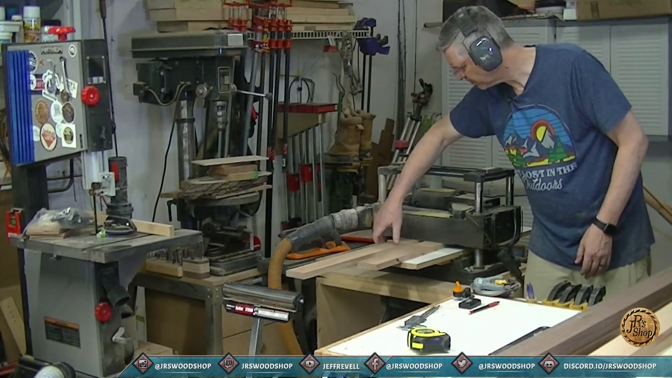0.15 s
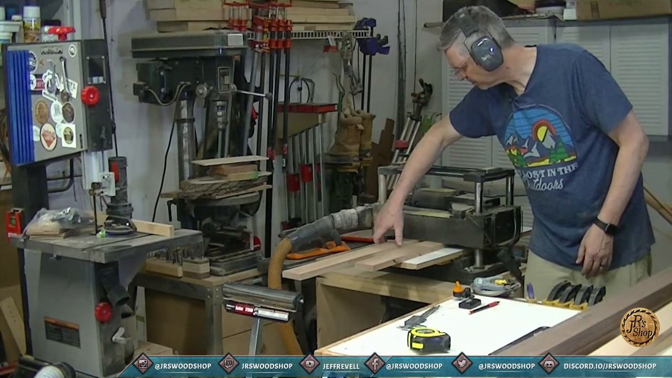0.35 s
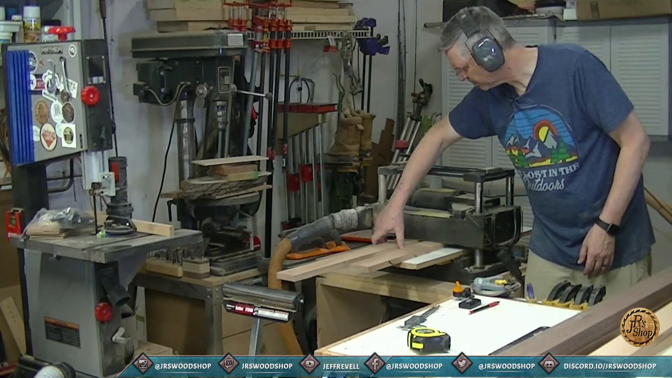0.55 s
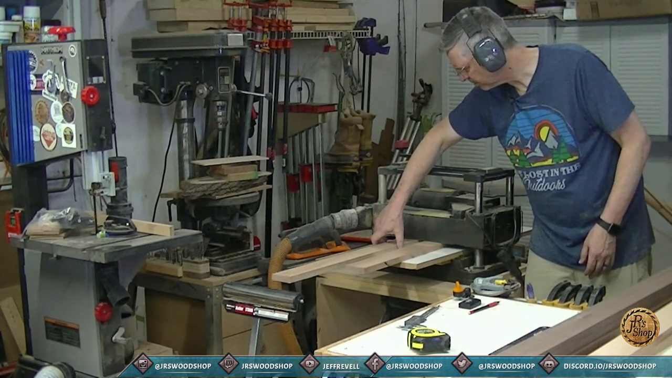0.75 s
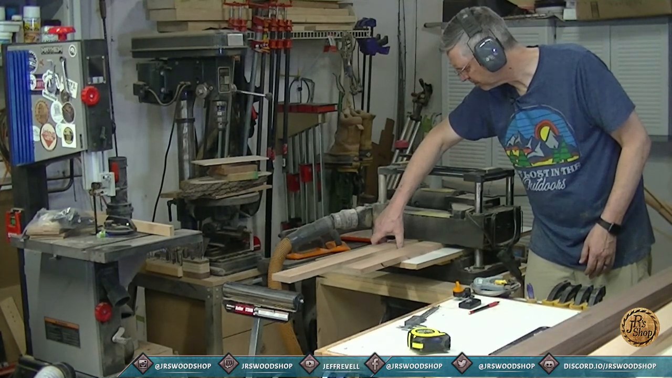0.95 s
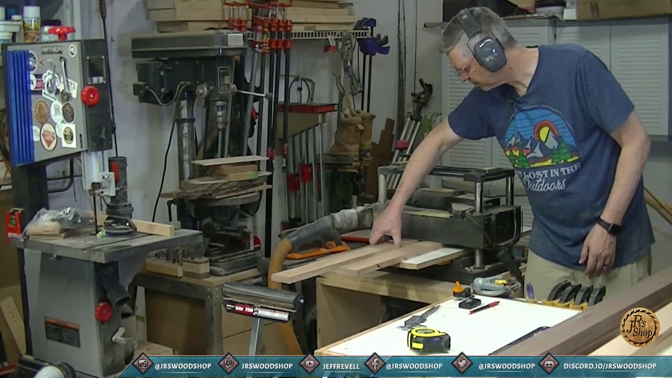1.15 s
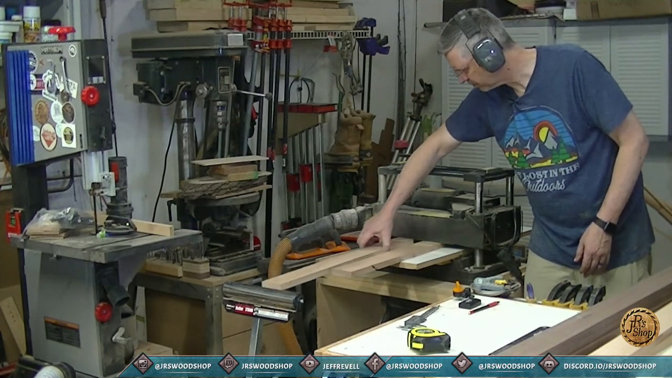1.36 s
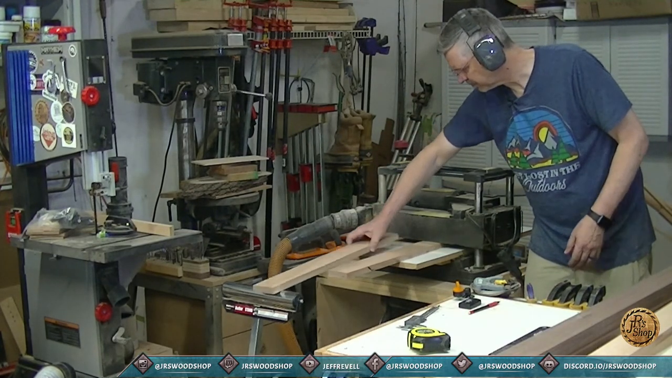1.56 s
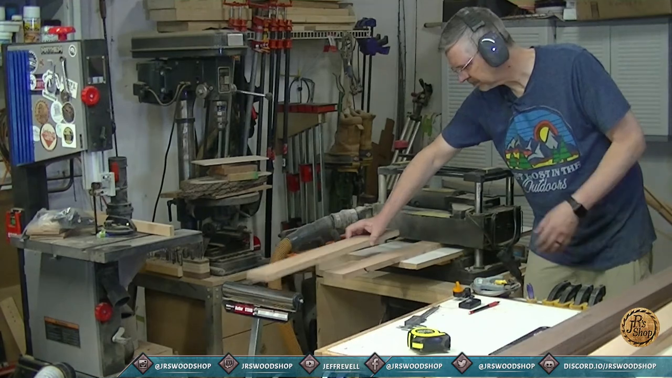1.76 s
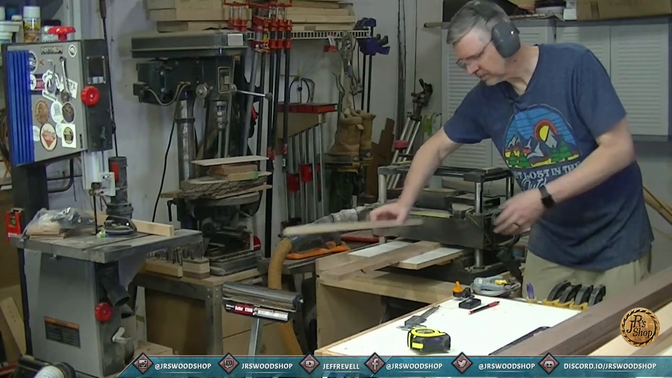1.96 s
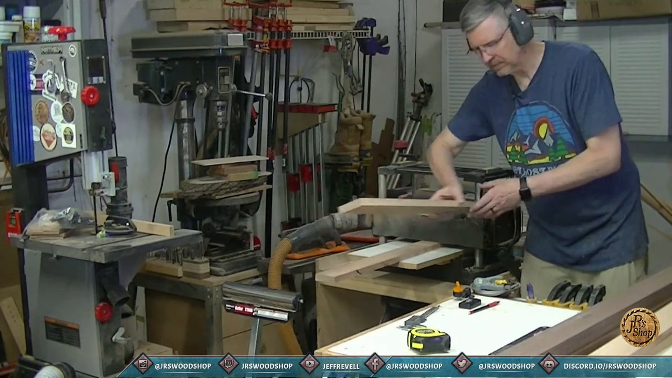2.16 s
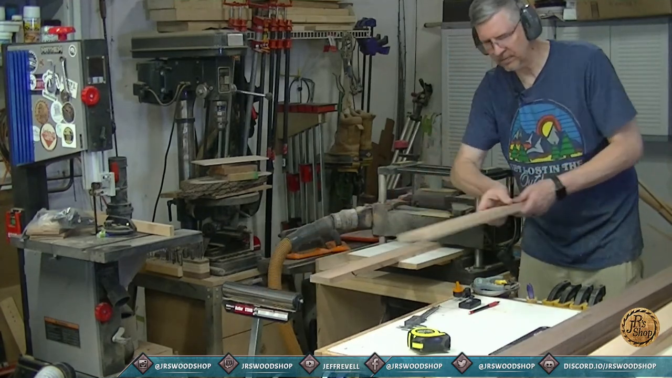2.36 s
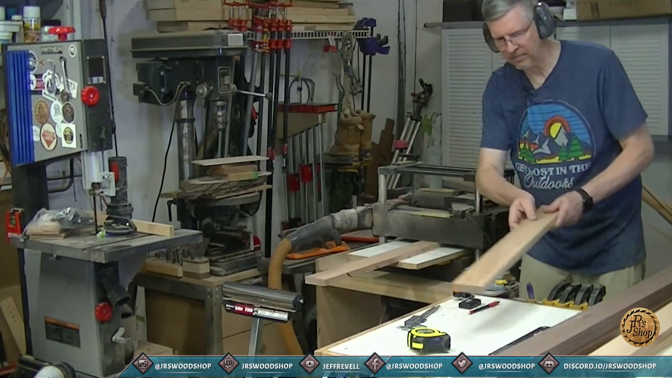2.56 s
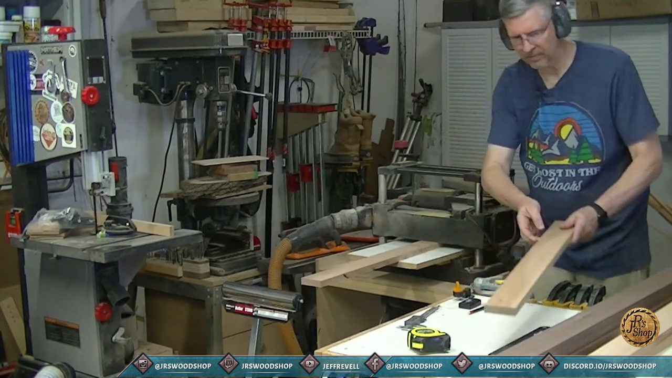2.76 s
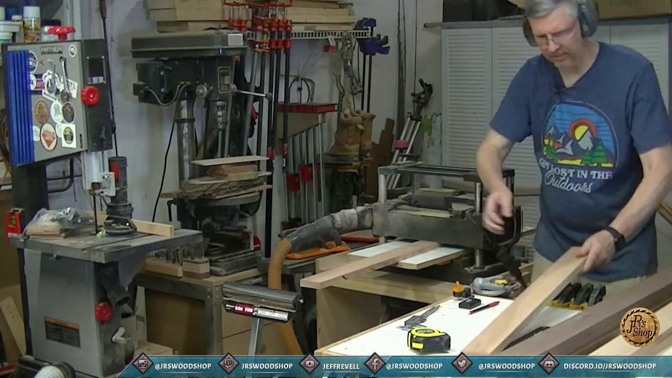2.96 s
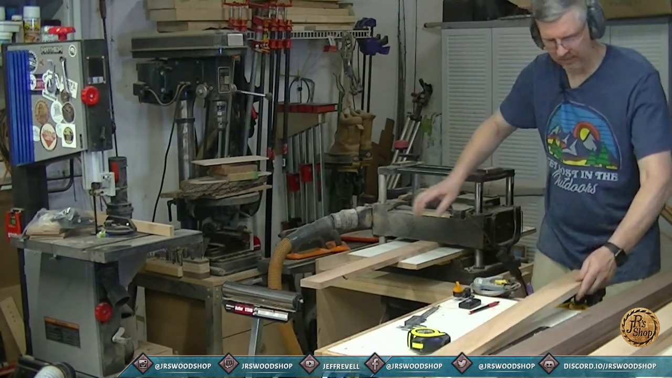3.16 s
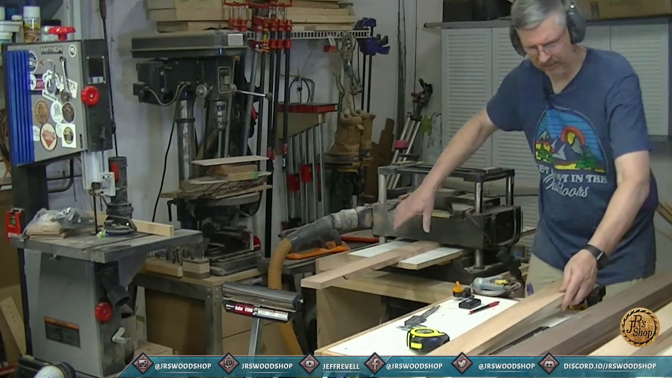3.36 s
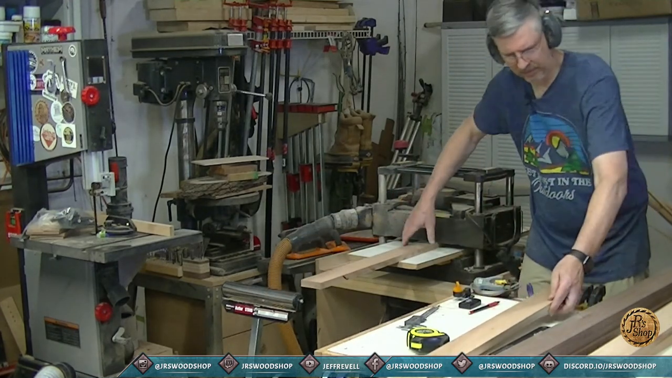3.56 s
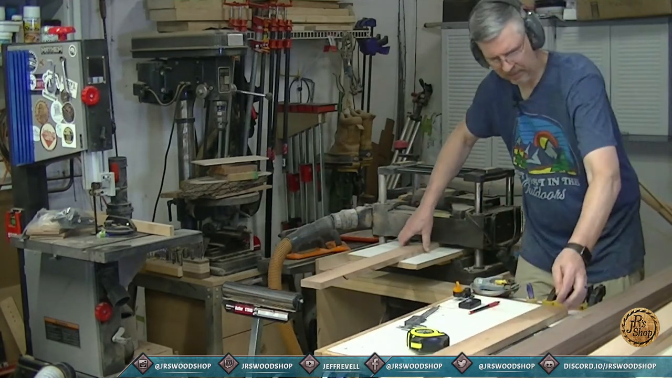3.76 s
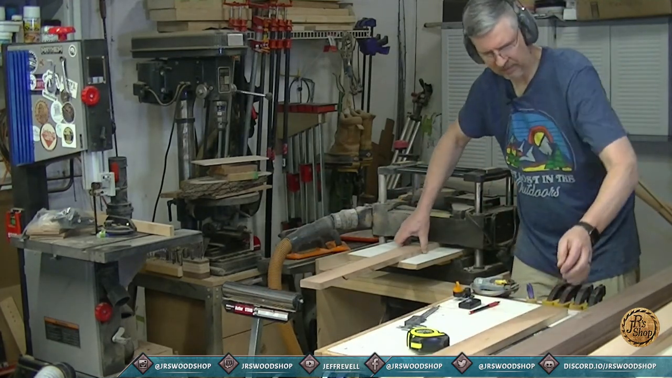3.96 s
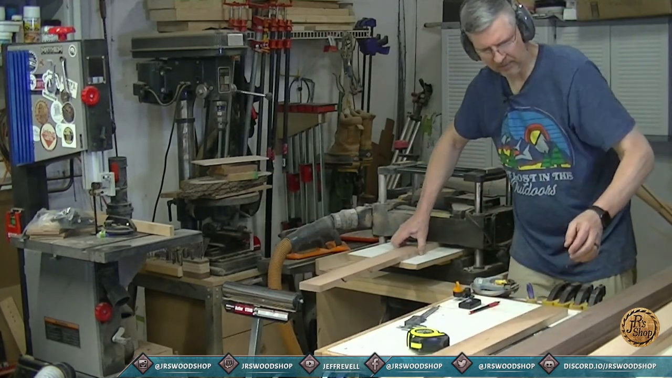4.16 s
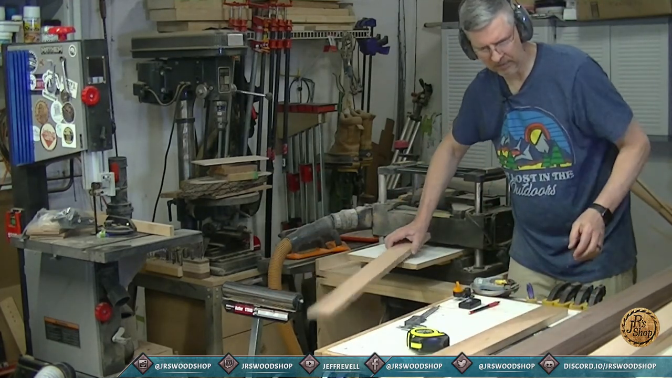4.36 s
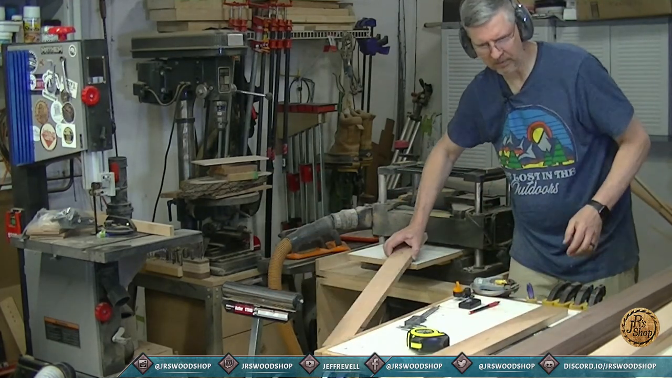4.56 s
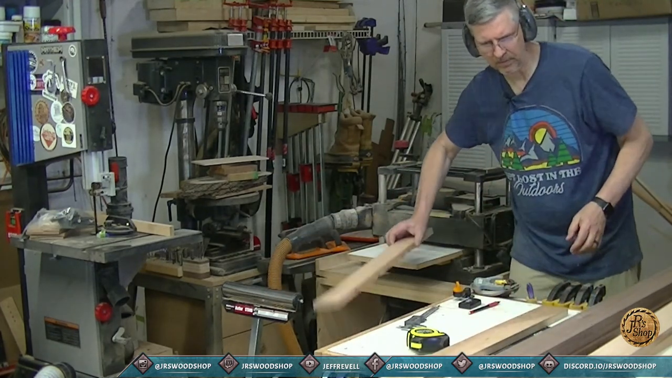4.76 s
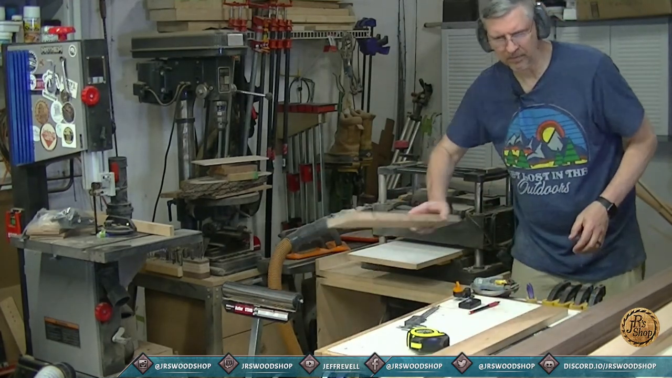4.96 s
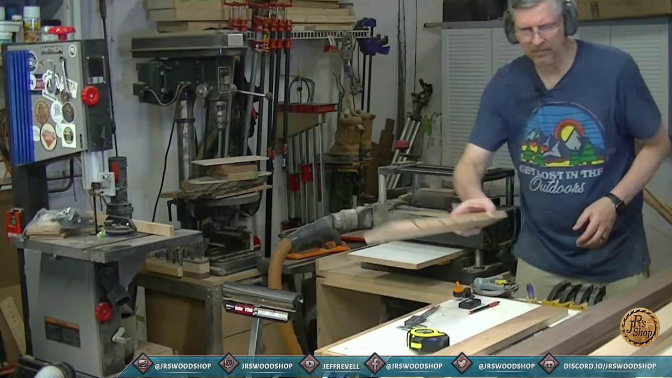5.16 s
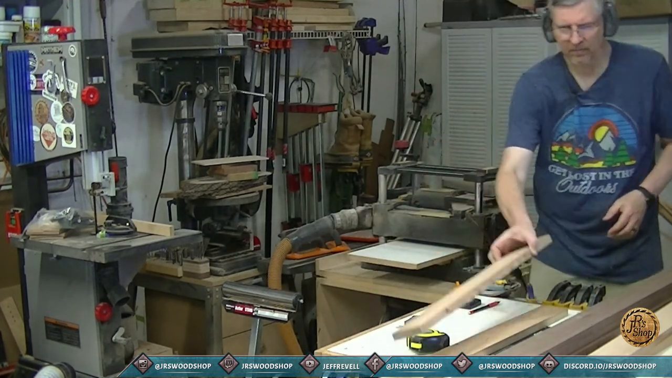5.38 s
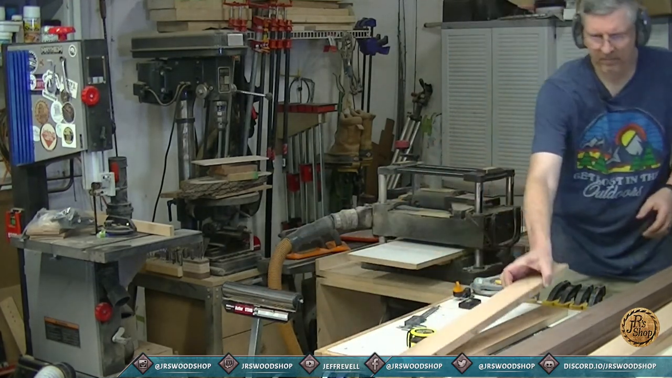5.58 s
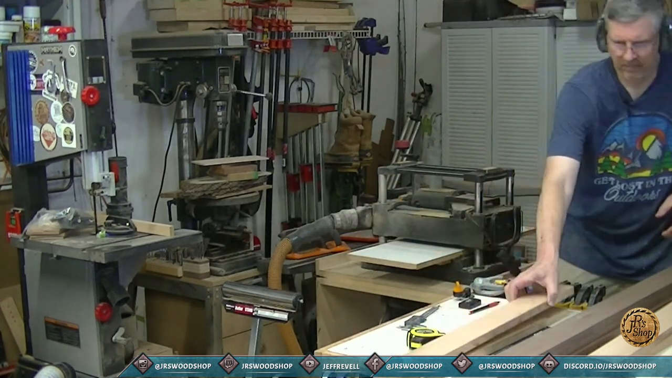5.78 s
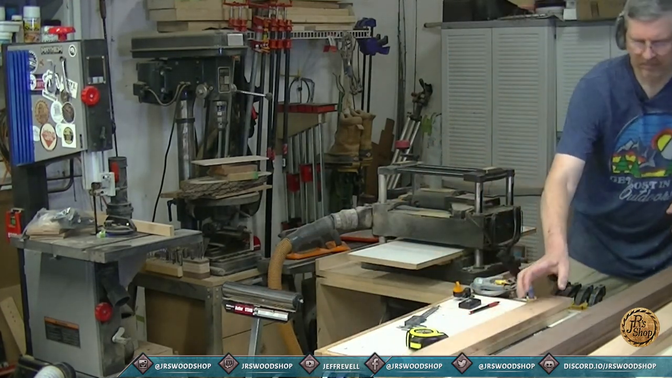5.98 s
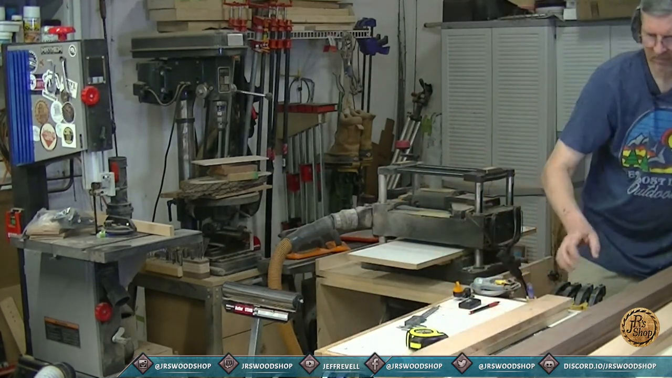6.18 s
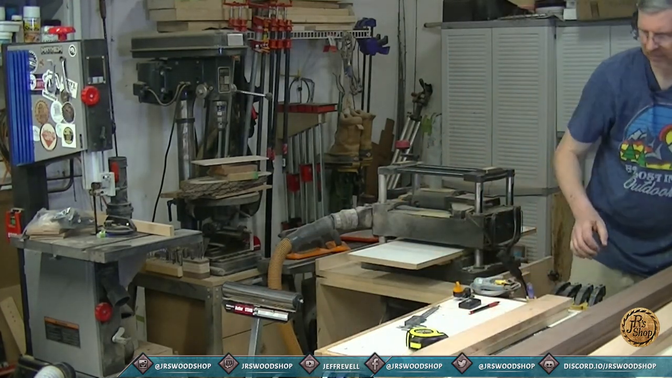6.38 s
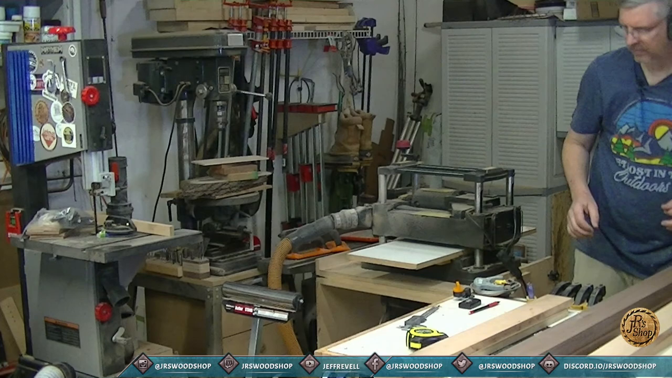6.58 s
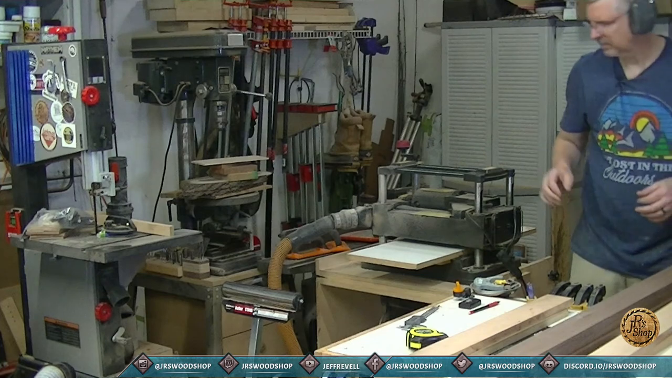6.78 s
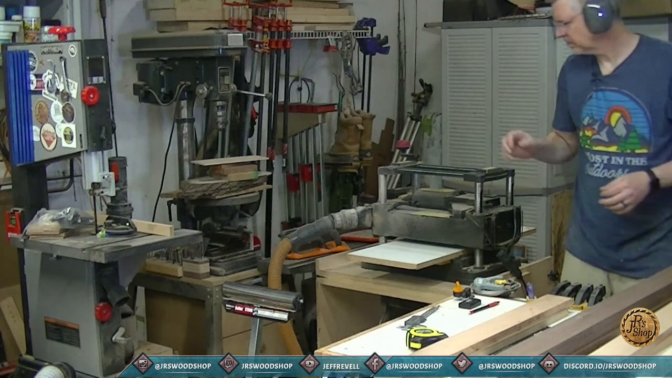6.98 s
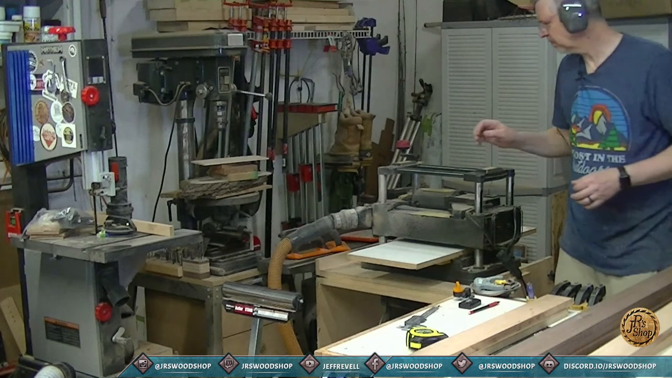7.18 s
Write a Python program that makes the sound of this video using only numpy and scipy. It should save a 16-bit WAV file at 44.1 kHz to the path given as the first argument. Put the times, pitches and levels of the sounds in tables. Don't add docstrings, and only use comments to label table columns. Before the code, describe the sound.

A benchtop planer drones and hisses through a board, then the cut stops, leaving rushing dust-collector air and small wooden knocks.

```python
import sys
import numpy as np
from scipy import signal
from scipy.fft import rfft, irfft, next_fast_len
from scipy.io import wavfile
from scipy.ndimage import uniform_filter1d, map_coordinates

SR = 44100
rng = np.random.default_rng(int(sys.argv[2]) if len(sys.argv) > 2 else 0)


def persist_wave(psi):
    counts = np.round(np.clip(psi, -1, 1) * 32767).astype(np.int16)
    wavfile.write(sys.argv[1], SR, np.atleast_2d(counts).T)


def undo_db(level):
    steps = np.asarray(level, float) / 20
    return 10 ** steps


N = 318843
TIME_S = np.arange(N) / SR
EXIT_S = 2.415
FAN_HZ = 2288.2


def at_hz(points, hz):
    knot_hz, db = np.transpose(points)
    return np.interp(np.log(np.maximum(hz, 1)), np.log(knot_hz), db)


def in_time(rows, s=TIME_S):
    return np.interp(s, *np.transpose(rows))


def drift(per_s, size=N):
    knots = rng.standard_normal(400)
    return np.interp(np.arange(size) * per_s / SR, np.arange(400), knots)


def wavering(hz, s, wide_hz, long_s):
    rows, columns = np.meshgrid(hz / wide_hz, s / long_s, indexing="ij")
    return map_coordinates(rng.standard_normal((600, 260)), [rows, columns], order=1)


def bump(hz, centre_hz, width_hz):
    return np.exp(-((hz - centre_hz) / width_hz) ** 2)


def coloured(x, spectrum):
    size = next_fast_len(N)
    hz = np.arange(size // 2 + 1) * SR / size
    inside = (hz > spectrum[0][0]) & (hz < spectrum[-1][0])
    out = irfft(rfft(x, size) * undo_db(at_hz(spectrum, hz)) * inside, size)[:N]
    return out / np.std(out)


def brighten(x, top_db, edge_hz):
    high = signal.butter(2, edge_hz, "high", fs=SR, output="sos")
    return x + (undo_db(top_db) - 1) * signal.sosfilt(high, x)


# frequency in Hz, level in dB per order.
KNIFE = [(4000, -25), (5500, -13), (7000, -5), (8500, -1), (12000, 0), (15800, -3)]


def knives(turns, odd_db, scatter_db, wander_db):
    cutting = round((EXIT_S + .2) * SR)
    out = np.zeros(N)
    for order in range(27, 104):
        start, scatter = rng.random(), rng.standard_normal()
        level_db = at_hz(KNIFE, order * SPEED[-1][1]) + odd_db * (order % 2) + scatter_db * scatter
        level_db = level_db + wander_db * drift(7.05, size=cutting)
        out[:cutting] += undo_db(level_db) * np.sin(2 * np.pi * (order * turns[:cutting] + start))
    return out / np.std(out[:cutting])


# frequency in Hz, level in dB per Hz.
CHIPS = [(140, 7.5), (230, -5.5), (380, 0.5), (600, -3.5), (1000, -2), (1500, 2.5), (3000, 4.5),
         (4700, 4.5), (8000, -1.5), (12000, -3.5), (16500, -17)]


def chips(turns, chop, uneven):
    stroke = np.exp(chop * np.cos(4 * np.pi * turns) + uneven * np.cos(2 * np.pi * turns))
    return coloured(stroke * rng.standard_normal(N), CHIPS)


# time in seconds, speed in turns per second.
SPEED = [(0.0, 146.32), (0.45, 149.9), (0.6, 150.67), (1.35, 154.44), (1.5, 154.6), (1.65, 153.62),
         (1.8, 153.62), (2.25, 154.45), (2.5, 155.66)]


def planer_cut():
    turns = np.cumsum(in_time(SPEED) + .03 * drift(25)) / SR
    after_s = TIME_S - EXIT_S
    tone_db = 2.0 - 200 * np.maximum(after_s + 0.07, 0)
    tone = undo_db(tone_db) * knives(turns, odd_db=-4.5, scatter_db=1.5, wander_db=1.6)
    spurt_db = 8.5 * np.exp(-((after_s + .02) / 0.04) ** 2)
    hiss = brighten(chips(turns, chop=0.06, uneven=0.04), spurt_db, edge_hz=6500)
    level_db = -39 + 0.25 * drift(7.86) - 110 * np.maximum(after_s, 0)
    return undo_db(level_db) * brighten(hiss + tone, top_db=5, edge_hz=15800)


# time in seconds, air level in dB.
AIR = [(0, -48), (2.3, -49), (2.55, -52), (2.9, -52.5), (3.3, -50), (3.8, -48), (4.3, -48.5), (4.5, -49),
       (4.8, -48), (5.2, -50.5), (5.5, -53.5), (5.9, -52), (6.3, -52.5), (6.75, -49.5), (7.0, -50),
       (7.23, -48)]


def nearness_db(s=TIME_S):
    return in_time(AIR, s) + 50


# frequency in Hz, level in dB per Hz.
RUSH = [(140, -10.5), (230, -13), (380, -18.5), (600, -15.5), (1000, -12.5), (1500, -10), (3100, -9),
        (3600, -7), (4500, -4), (4850, -2.5), (6400, -1), (10000, -6), (13000, -9), (16500, -13)]
# frequency in Hz, level in dB per Hz.
RUMBLE = [(3, 0), (15, 0), (87, 2), (151, -1), (200, -4.5), (260, -24), (440, -120)]
# time in seconds, extra brightness in dB.
TOP_LIFT = [(0, -6), (3.2, -2.5), (3.8, -3), (5, 2), (6.5, 2.5), (6.9, -18), (7.23, 3)]


def air_flow():
    nearer_db = nearness_db()
    top_db = -2 + 1.6 * nearer_db + in_time(TOP_LIFT)
    rush = brighten(coloured(rng.standard_normal(N), RUSH), top_db, edge_hz=14700)
    rumble = coloured(rng.standard_normal(N), RUMBLE)
    rumble_db = -60.5 + 1.03 * nearer_db + 1.5 * drift(4.8)
    return undo_db(nearer_db - 43) * rush + undo_db(rumble_db) * rumble


# multiple of the blade rate, level in dB.
FAN = [(4, -67), (5, -63.5), (6, -70)]


def fan_whistle():
    blades = np.cumsum(FAN_HZ + 1.1 * drift(14)) / SR
    tones = np.zeros(N)
    for multiple, db in FAN:
        tones += undo_db(db + 2.5 * drift(3)) * np.sin(2 * np.pi * multiple * blades)
    shaded_db = -7 * (TIME_S < EXIT_S)
    return tones * undo_db(2.2 * nearness_db() - 3 + shaded_db)


# start in seconds, level in dB, t60 in seconds.
KNOCKS = [
    (1.965, -42, .12),
    (4.38, -50, .1),
    (5.928, -43.5, .3),
    (5.937, -43, 0.037),
    (5.951, -54, .08),
]


def knocks():
    out = np.zeros(N)
    burst = coloured(rng.standard_normal(N), [(1500, -11), (6000, 11), (11000, -9)])
    for start_s, db, t60_s in KNOCKS:
        after_s = np.maximum(TIME_S - start_s, 0)
        out += np.minimum(after_s / .004, 1) * undo_db(db - 60 * after_s / t60_s)
    return out * burst


# frequency in Hz, level in dB.
HOSE_WHISTLES = [(9180, -67), (10150, -78), (11520, -66), (13700, -74), (14200, -74)]


def hose_whistles(width_hz):
    size = next_fast_len(N)
    hz = np.arange(size // 2 + 1) * SR / size
    shape = sum(undo_db(db) * bump(hz, at, width_hz) for at, db in HOSE_WHISTLES)
    tones = irfft(rfft(rng.standard_normal(size)) * shape, size)[:N]
    tones = tones * np.sqrt(SR / 2.5 / width_hz)
    return tones * undo_db(nearness_db()) * (TIME_S > EXIT_S)


def scene():
    mono = planer_cut() + air_flow() + fan_whistle() + knocks() + hose_whistles(width_hz=9.9)
    return np.array([mono, mono])


# frequency in Hz, spread in dB.
WARBLE = [(130, 2.5), (300, 4.5), (1200, 5), (3500, 4.5), (4500, 2.5), (5100, 0.5), (9000, 1.5),
          (16000, 0.5)]
# frequency in Hz, spread in dB.
SWELL = [(130, 1.2), (400, 1.5), (1200, 0.5), (3000, 0.8), (5000, 0.5), (9000, 0.5), (16000, 1.8)]


def unrest(hz, s):
    cutting = s < EXIT_S
    streaks_db = at_hz(WARBLE, hz)[:, None] * wavering(hz, s, 60, .045) * np.where(cutting, .7, 1)
    patches_db = at_hz(SWELL, hz)[:, None] * wavering(hz, s, 692, .05)
    flutter_db = 0.25 * np.interp(s, TIME_S, drift(18))
    treble_db = 1.0 * (hz > 4000)[:, None] * cutting * wavering(hz, s, 1300, .2)
    return streaks_db + patches_db + flutter_db + treble_db


# cutter order, depth in dB.
UPPER_NOTCH = [(23, 12), (36, 11), (50, 7), (104, 4)]
# frequency in Hz, width in Hz, depth in dB.
CUT_DIPS = [(3000, 440, 3.5), (900, 37, 4), (1225, 20, 0)]
# time in seconds, frequency in Hz, depth in dB.
DULL_TOP = [(0, 13100, 4), (.8, 13500, 2.5), (1.4, 13800, 2), (2.5, 14300, 1.2)]
# frequency in Hz, width in Hz, depth in dB.
IDLE_NOTCHES = [(168, 35, 18), (333, 34, 2), (697, 25, 6), (1010, 45, 4), (1420, 50, 2), (2950, 300, 2),
                (3800, 40, 2), (4200, 110, 5), (4480, 90, 2.5), (6030, 100, 4)]


def notches(hz, s, width_hz):
    column_hz = hz[:, None]
    speed, orders = in_time(SPEED, s), np.arange(200)
    low_db = np.where(orders % 2, 14, 17)
    depth_db = np.where(orders < 23, low_db, in_time(UPPER_NOTCH, orders))
    nearest = np.clip(np.round(column_hz / speed), 1, 199).astype(int)
    chance = map_coordinates(rng.standard_normal((200, 100)), [nearest, 11 * s + 0 * nearest], order=1)
    flicker = 1 + (.08 + .5 / nearest) * chance
    cut = depth_db[nearest] * flicker * bump(column_hz, nearest * speed, width_hz)
    cut = cut + 14 * bump(column_hz, 2.5 * speed, width_hz)
    cut = cut + (1.3 - s / 4) * sum(db * bump(column_hz, at, width) for at, width, db in CUT_DIPS)
    knot_s, knot_hz, knot_db = np.transpose(DULL_TOP)
    climb_hz, climb_db = np.interp(s, knot_s, knot_hz), np.interp(s, knot_s, knot_db)
    cut = cut + climb_db * bump(column_hz, climb_hz, 1000)
    held = 2.5 * np.exp(-((s - EXIT_S) / 0.27) ** 2) * (column_hz < 4600)
    idle = sum(db * bump(column_hz, at, width) for at, width, db in IDLE_NOTCHES)
    idle = idle * (1 + .5 * wavering(hz, s, 400, .2)) + held
    fan = 11 * bump(column_hz, 3 * FAN_HZ, width_hz)
    return np.where(s < SPEED[-1][0], cut, idle) + fan


# frequency in Hz, level in dB relative to the loudness.
GATE = [(130, -60), (200, -32.5), (400, -34.5), (700, -31.5), (1000, -32.5), (1400, -32.5), (3200, -34),
        (5000, -44)]
# time in seconds, half length in seconds, centre in Hz, reach in log pitch.
CLAMPED = [(0.31, 0.13, 393, 0.19), (0.683, 0.037, 385, 0.14), (1.0, 0.045, 383, 0.16),
           (1.166, 0.033, 385, 0.27), (1.49, 0.061, 387, 0.28), (2.277, 0.081, 387, 0.24),
           (2.547, 0.047, 310, 0.61), (2.52, .05, 965, .15), (2.467, 0.034, 219, .2),
           (2.723, .04, 340, .15), (2.773, 0.022, 470, 0.42), (2.853, 0.02, 540, 0.55),
           (2.945, 0.09, 387, 0.344), (3.115, 0.028, 415, 0.45), (4.4, 0.091, 385, 0.28),
           (4.75, 0.094, 394, 0.29), (4.83, 0.037, 420, 0.53), (4.928, 0.071, 286, 0.35),
           (5.15, 0.11, 391, 0.25), (5.26, 0.039, 350, 0.76), (5.61, .035, 430, .15),
           (5.768, 0.022, 260, 0.43), (5.88, .04, 620, .2), (6.066, 0.028, 347, 0.33),
           (6.2, 0.048, 564, .2), (6.318, 0.055, 370, 0.41), (6.546, 0.036, 407, 0.16),
           (6.94, 0.051, 282, 0.35), (7.17, 0.049, 434, 0.35)]


def gate(cells, hz, s, steep, floor_db):
    power = uniform_filter1d(np.abs(cells) ** 2, size=2, axis=1) + 1e-20
    band = np.arange(len(hz)) // 4
    band_power = np.add.reduceat(power, np.arange(0, len(hz), 4))[band]
    loudness = uniform_filter1d(power.sum(axis=0), size=9)
    column_hz = hz[:, None]
    ease_db = np.where(s < EXIT_S, -1, -1.5) + 0.5 * np.interp(s, TIME_S, drift(28))
    ease_db = ease_db * np.exp(-(np.log(column_hz / 385 + 1e-9) / .22) ** 2)
    for at, half_s, centre_hz, reach in CLAMPED:
        pitch = np.log(column_hz / centre_hz + 1e-9) / reach
        ease_db = ease_db - 13.0 * np.exp(-((s - at) / half_s) ** 4 - pitch ** 4)
    ease_db = ease_db + 3.5 * wavering(hz, 2 * s, 86, .06)[4 * band]
    ease_db = ease_db + 0.24 * nearness_db(s)
    threshold_db = at_hz(GATE, 4 * (band + .5) * hz[1])[:, None]
    under_db = 10 * np.log10(band_power / loudness) - threshold_db + ease_db
    return cells * undo_db(np.clip(steep * under_db, floor_db, 0))


STRAYS = [.04, .13, .29, .53, .64, 1.47, 1.6, 1.63, 1.66, 1.84, 2.34, 2.39, 2.58, 2.77, 2.91, 3.07, 3.1,
          3.16, 3.44, 3.76, 3.87, 4.12, 4.37, 4.42, 4.44, 4.66, 4.71, 4.82, 4.94, 5.04, 5.21, 5.5, 5.63,
          6.03, 6.1, 6.3, 6.37, 6.6, 6.65]


def stray_side(cells, hz, s, band_share, level_db):
    band = (hz / 689).astype(int)
    chosen = np.zeros((band[-1] + 1, len(s)), bool)
    lowest_bands = rng.integers(6, 11, len(STRAYS))
    chances = rng.random((len(STRAYS), 11))
    for at, lowest, others in zip(STRAYS, lowest_bands, chances):
        frame = np.argmin(np.abs(s - at))
        chosen[lowest:lowest + 2, frame] = True
        chosen[12:23, frame] = others < band_share
    upper = (np.arange(len(chosen)) > 10)[:, None]
    chosen = chosen | (np.roll(chosen, -1, axis=0) & upper)
    level = uniform_filter1d(np.abs(cells), size=31, axis=0) * undo_db(level_db)
    noise = signal.stft(rng.standard_normal(N), nperseg=2048, noverlap=1536)[2]
    return level * noise / np.abs(noise).mean() * chosen[band]


def band_limit(x):
    return signal.sosfilt(signal.butter(12, 16750, fs=SR, output="sos"), x)


def record(dry):
    hz, s, cells = signal.stft(dry[0], SR, nperseg=2048, noverlap=1536)
    cells = cells * undo_db(unrest(hz, s) - notches(hz, s, width_hz=36))
    cells = gate(cells, hz, s, steep=11, floor_db=-45) * (hz < 15740)[:, None]
    side = stray_side(cells, hz, s, band_share=.07, level_db=3)
    mid, side = (signal.istft(c, SR, nperseg=2048, noverlap=1536)[1][:N] for c in (cells, side))
    return band_limit(np.array([mid + side, mid - side]))


dry = scene()
out = record(dry)
persist_wave(out)
```